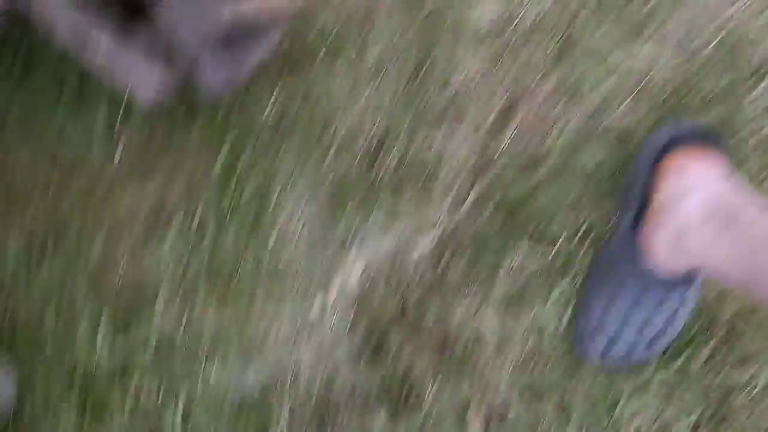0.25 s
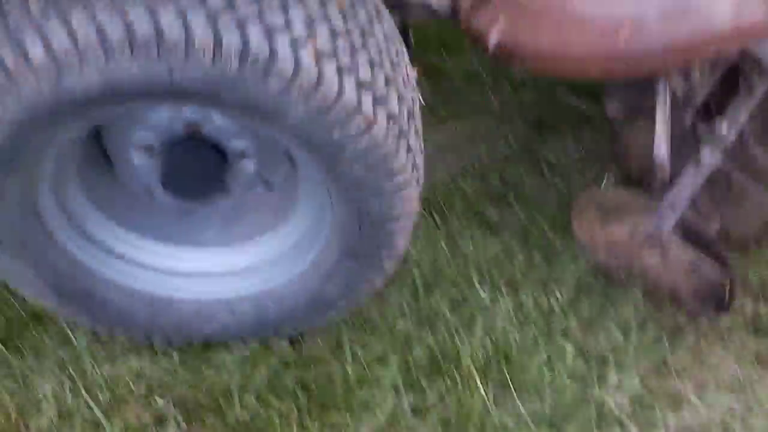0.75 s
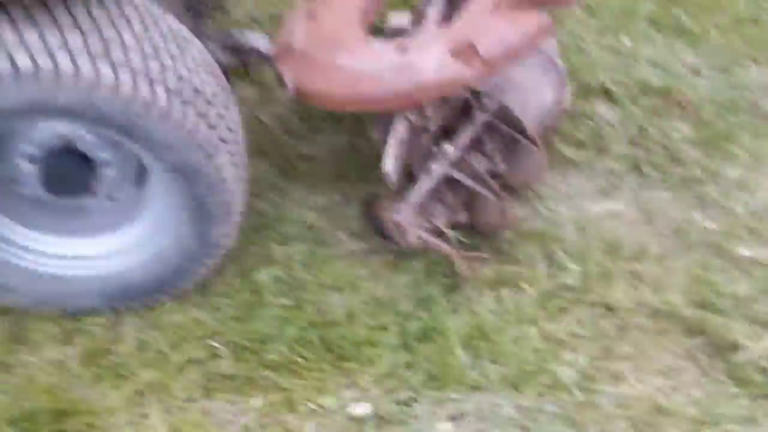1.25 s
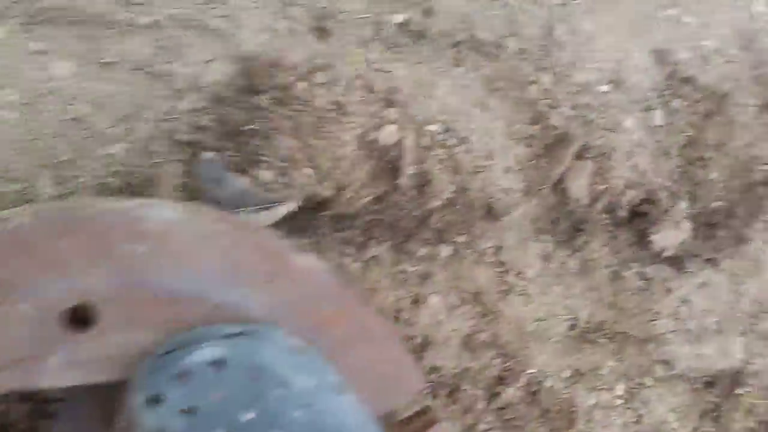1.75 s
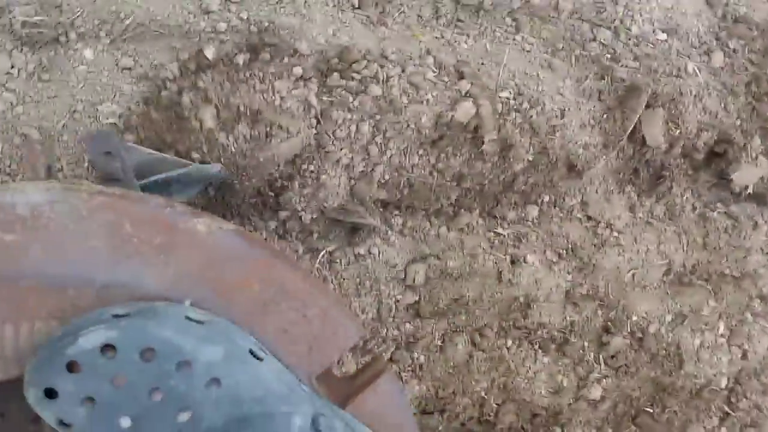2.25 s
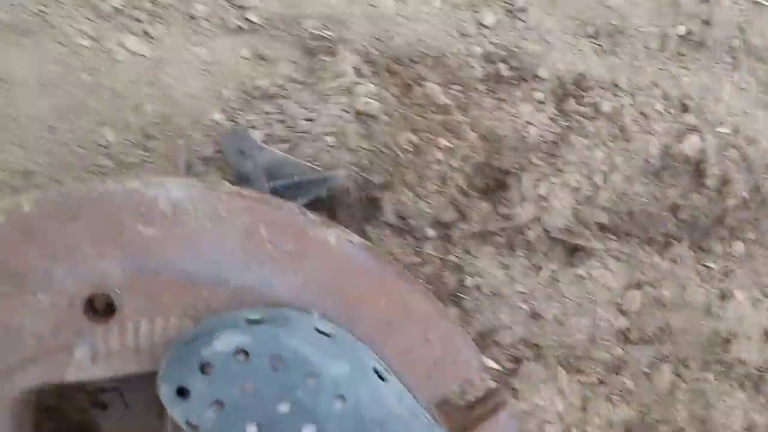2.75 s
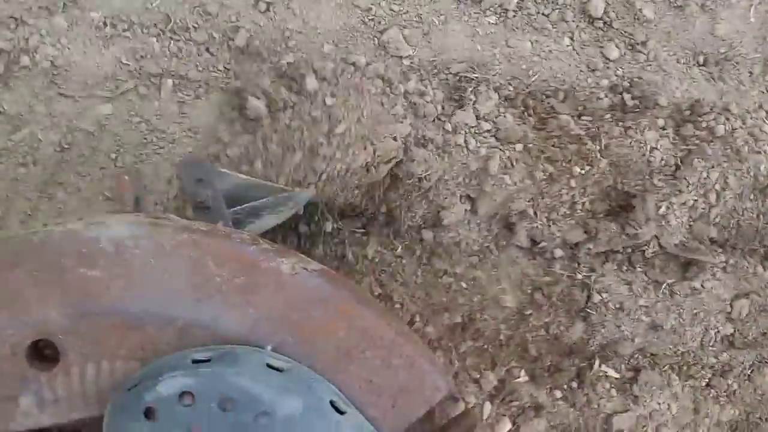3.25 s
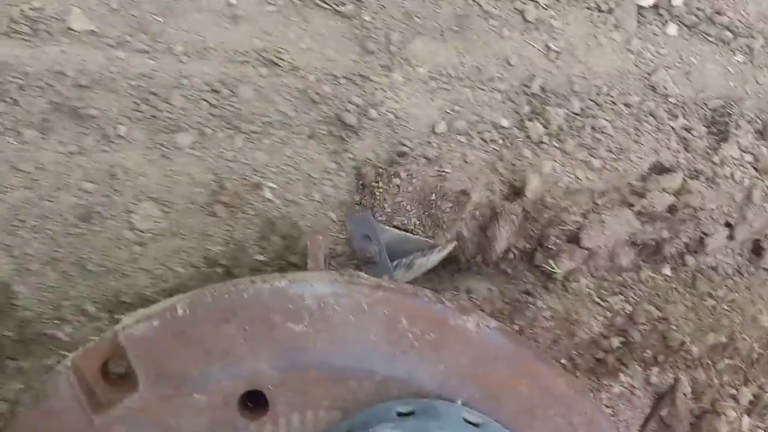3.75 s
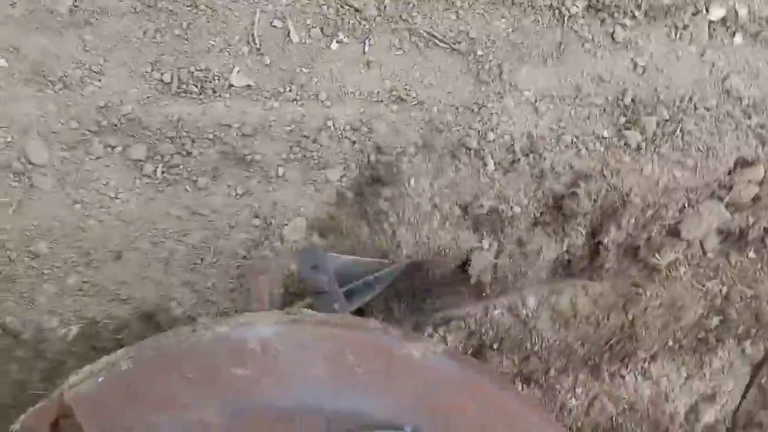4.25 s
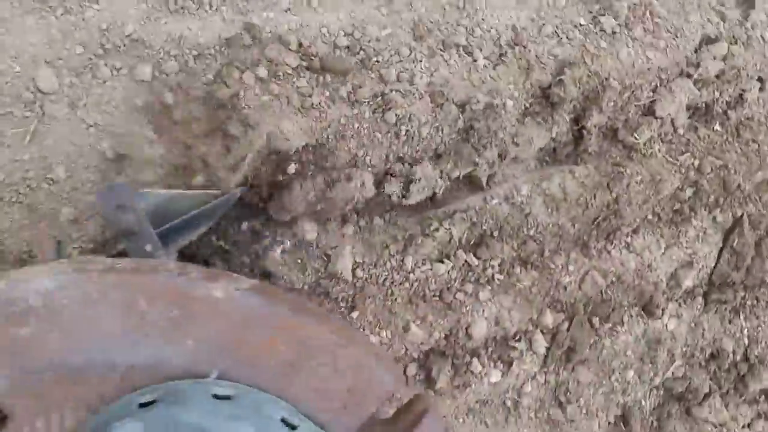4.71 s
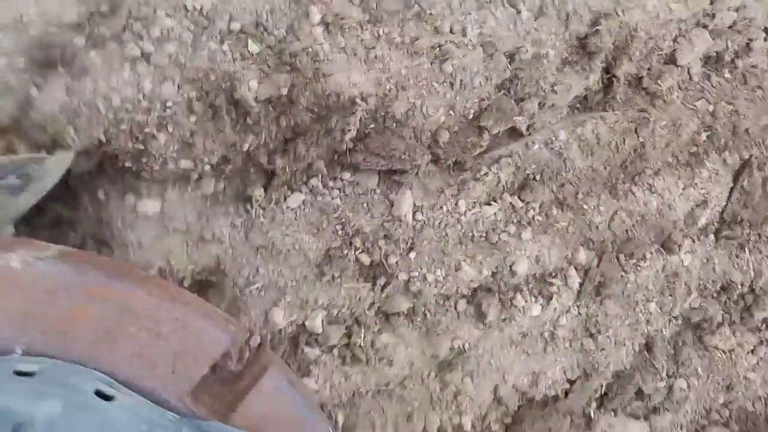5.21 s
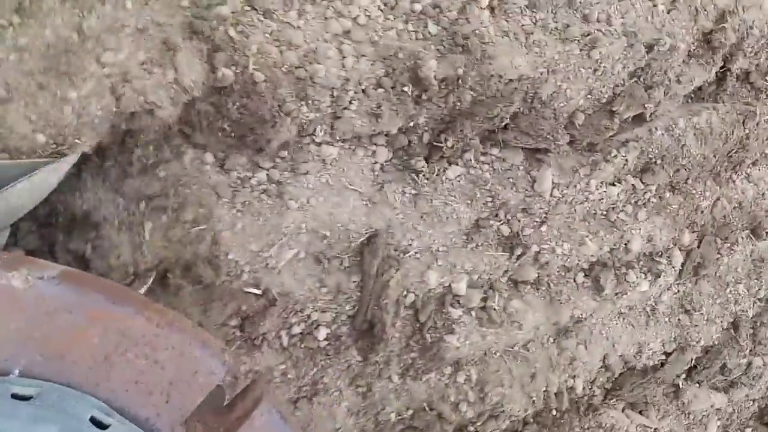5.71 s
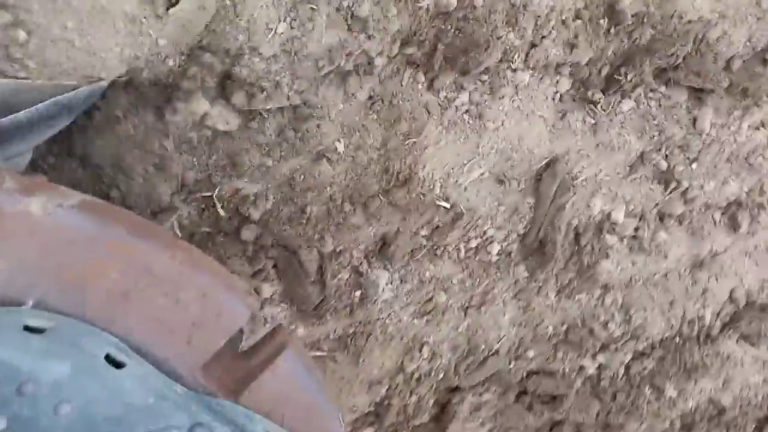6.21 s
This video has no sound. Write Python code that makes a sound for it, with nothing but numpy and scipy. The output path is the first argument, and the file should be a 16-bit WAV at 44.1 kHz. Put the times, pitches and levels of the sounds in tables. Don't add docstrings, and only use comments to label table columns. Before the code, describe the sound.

Close outdoor small tractor engine: lumpy low-speed putter with one soft footstep, sudden cut to a higher, loaded clattering roar with small stone ticks.

```python
import sys
import numpy as np
from scipy import signal
from scipy.fft import rfft, irfft
from scipy.io import wavfile
from scipy.ndimage import uniform_filter1d, map_coordinates

SR = 44100
rng = np.random.default_rng(int(sys.argv[2]) if len(sys.argv) > 2 else 0)


def unload_audio(sound):
    columns = np.transpose(np.atleast_2d(sound))
    steps = np.round(np.clip(columns, -1, 1) * 32767)
    wavfile.write(sys.argv[1], SR, steps.astype(np.int16))


def volts_from_decibels(level):
    exponent = np.asarray(level, float) / 20
    return 10 ** exponent


N = 285327
T = np.arange(N) / SR
HZ = np.maximum(np.fft.rfftfreq(N, 1 / SR), 1)

# t/s, effort/0-1, facing/0-1
SLOW_EFFORT = [
    (0, 0, 0),
    (.24, 0.8, 0),
    (.36, 0.6, 0.65),
    (.49, 0.88, 1),
    (.61, 1, 0.73),
    (.84, 0.26, 1),
    (1.0, 0.47, 1),
    (1.356, 0.15, 0.48),
]
FAST_EFFORT = [
    (1.361, 0, 0.17),
    (2.1, 0.38, 0.16),
    (2.7, 0.89, 0.5),
    (4.3, 0.56, 0.7),
    (5.4, 1, 0.23),
    (6.47, 0.77, 0.48),
]
# t/s, cycle rate/Hz
SLOW_SPEED = [(0, 21.4), (.25, 20.5), (.55, 20.05), (.65, 20.25), (.85, 21.03), (.97, 20.9), (1.356, 19.75)]
FAST_SPEED = [(2.4, 29.40), (3.0, 29.47), (4.3, 29.47), (4.8, 29.42), (5.4, 29.46)]
# multiple of the cycle rate/1, level/dB
SLOW_ORDERS = [(1, -46), (2, -27), (3, -16), (4, -14), (5, 0), (6, -2), (7, -11.5), (8, -5), (9, -15),
               (10, -6), (11, -10), (12, -15), (13, -19), (14, -21), (15, -13), (16, -11), (17, -22)]
FAST_ORDERS = [(1, -51), (2, -6.5), (3, -4), (4, -11.5), (5, -2), (6, -5.5), (7, -9), (8, -9.5), (9, -20.5),
               (10, -8), (11, -13.5), (12, -24.5), (13, -12), (14, -39), (15, -18), (16, -22), (17, -43),
               (18, -46), (19, -35.5), (20, -21), (21, -18.5), (22, -33), (23, -18)]
SLOW_FIRING = (.387, .86, .358, .65, 2.9, -.58, .10)
FAST_FIRING = (.411, 1.18, .114, .77, 18.4, 3.09, .15)
# f/Hz, level/dB
SLOW_GAS = [(60, -14), (200, -10.5), (320, -5), (420, -12), (600, -10), (870, -10.5), (960, -14.5),
            (1300, -12.5), (1700, -18)]
FAST_GAS = [(60, -4.5), (200, -16.5), (320, -1.5), (500, -7), (780, -7.5), (870, -2.5), (1000, -13.5),
            (1300, -11), (1700, -6)]
# f/Hz, level/dB
SLOW_BLOCK = [(590, -29), (1000, -33), (1170, -23), (1260, -5.5), (1650, 4), (2060, -4.5), (2170, -4.5),
              (2700, -10), (3240, -16), (4980, -20), (6500, -41), (8450, -56), (14300, -120)]
FAST_BLOCK = [(590, -13), (1000, 1), (1140, 3.5), (1260, -6), (1570, -6.5), (1800, 4.5), (2370, 0),
              (2900, -5), (3250, -14.5), (4000, -14), (4640, -19), (5260, -19.5), (6010, -28), (6500, -30),
              (8450, -146), (14300, -120)]
# f/Hz, width/Hz, level against the rattle/dB
SLOW_TIN = [(555, 36, -11.5), (875, 8.7, -9.5), (1808, 110, -30), (3500, 130, -31), (7660, 210, -34.5)]
FAST_TIN = [(700, 27, -7.5), (1730, 19, -9.5), (1821, 18, -8.5), (1965, 10.5, -13), (2296, 22, -9.5),
            (3390, 71, -21.5), (3950, 130, -30), (4870, 43, -25), (5250, 51, -25), (7160, 60, -27.5)]
# f/Hz, level/dB
SLOW_FAN = [(4000, -27), (5800, 1.5), (7200, 3.5), (8100, -11), (8500, -3), (10000, -6), (11500, -2),
            (13500, -3), (14900, -6), (15700, -8)]
FAST_FAN = [(4000, -30), (5800, -6), (7200, 2), (8150, -6), (8350, -24), (8800, -28), (9300, -20),
            (9900, -12), (11300, -10), (13200, -12), (14200, -16), (15300, -17), (15700, -24)]
# level/dB, gain at full effort/dB, gain when faced/dB
SLOW_LAYERS = [
    (-19.5, 3, 0),
    (-25.5, -0.4, -1.4),
    (-30, -2.5, 6),
    (-33, 2.1, 0.7),
    (-42, 0, 5),
]
FAST_LAYERS = [
    (-18.5, 2.02, 1.5),
    (-28, 0.53, 3),
    (-32, 4.3, 0.5),
    (-31, 0.28, 3.86),
    (-40, 0.49, 4.4),
]
# t/s, held/s, f/Hz, level/dB
HOLLOW = [(-.1, 0.47, 3500, -37.5), (.28, 0.27, 1780, -30.5), (.35, 0.29, 4210, -33), (.68, 0.4, 3950, -35),
          (1.3, 0.71, 3810, -35.5), (2.0, 1.8, 3620, -39), (3.7, .6, 3870, -44), (4.3, 0.72, 3800, -38),
          (4.95, 1.7, 4220, -39.5)]
# slap t/s, slap level/dB, thud t/s, thud f/Hz, thud level/dB, thud length/s
STEP = (.287, -22.5, .32, 80, -16.5, .055)
# t/s, level/dB, f/Hz
STONES = [
    (3.90, -36, 7600),
    (4.655, -33, 7200),
    (6.188, -24, 1350),
]
# t/s, level/dB
SLOW_WIND = [(0, -36), (.25, -33), (.45, -36), (.7, -38), (1.356, -46)]
# f/Hz, share/0-1
DIRECT = [(60, .6), (200, .8), (500, .88), (1500, .8), (3000, .7), (6000, .52), (12000, .2)]
# f/Hz, left minus right level/dB
TILT = [(250, 0), (1300, -1), (4400, 2), (8000, -1.5), (15000, 3.5)]
# first shot ends t/s, second shot begins t/s
CUT_S = (1.356, 1.361)

SLOW_LAG, FAST_LAG = 16., 22.
SLOW_START, FAST_START = -.216, .299


def tractor(speed, effort_table, layers, lag, start, orders, firing, gas, block, fan, tin):
    s, *columns = np.transpose(effort_table)
    effort, facing = (np.interp(T, s, column) for column in columns)
    thump_gain, gas_gain, low_gain, high_gain, fan_gain = (
        volts_from_decibels(db + up_db * effort + faced_db * facing) for db, up_db, faced_db in layers)
    cycle_hz = np.interp(T, *np.transpose(speed)) * (1 + .002 * walk(12))
    phase = start + np.cumsum(cycle_hz) / SR
    thump = exhaust(phase, orders, firing, effort)
    chuff = gas_chuff(thump, gas)
    low, high = rattle(thump, block, tin)
    air = cooling_fan(fan)
    body = thump_gain * thump + low_gain * low + high_gain * high + fan_gain * air
    return reach(body, lag) + reach(gas_gain * chuff, 0.66 * lag)


def exhaust(phase, orders, firing, effort):
    gap, size, echo, echo_size, bass_lag, shape, rough = firing
    out = 0
    for k, db in orders:
        second_blow = 1 + size * np.exp(-2j * np.pi * k * gap)
        pipe_echo = 1 + echo_size * np.exp(-2j * np.pi * k * echo)
        offset = np.angle(second_blow * pipe_echo) + bass_lag / k + shape
        uneven = (walk(28) + 1j * walk(28)) / np.sqrt(2)
        burn = 1 + rough * min(k, 9) / 6 * uneven + .011 * k * walk(2.5)
        bark_db = 7 * (effort - 0.82) if k > 12 else 0
        tone = np.real(burn * np.exp(1j * (2 * np.pi * k * phase + offset)))
        out = out + volts_from_decibels(db + bark_db) * tone
    return unit(out)


def gas_chuff(thump, gas):
    return unit(1.1 + np.abs(thump)) * hiss(gas, flicker_db=1.2, count=5)


def rattle(thump, block, tin):
    spectrum = rfft(hiss(block, flicker_db=0.52, count=10) + tinwork(tin))
    low_share = 1 / (1 + (HZ / 3000) ** 8)
    parts = []
    for share in (low_share, 1 - low_share):
        knocks = (5 + np.abs(thump)) * volts_from_decibels(1.1 * walk(110))
        parts.append(unit(irfft(spectrum * share, N) * knocks))
    return parts


def tinwork(modes):
    spectrum, out = ports(), 0
    for hz, width, db in modes:
        ring = unit(irfft(spectrum / (1 + ((HZ - hz) / max(width, hz / 170)) ** 2), N))
        out = out + volts_from_decibels(db + 1.5 * walk(4) + 2.5 * walk(30)) * ring
    return out


def cooling_fan(fan):
    return hiss(fan, flicker_db=1.1, count=6) * unit(volts_from_decibels(1.1 * walk(90)))


def hollow():
    spectrum, out = ports(), 0
    for s, held, hz, db in HOLLOW:
        band = unit(irfft(spectrum / (1 + ((HZ - hz) / 135) ** 2), N))
        out = out + volts_from_decibels(db) * band * np.clip(np.minimum(T - s, s + held - T) / .08 + .5, 0, 1)
    return reach(out * volts_from_decibels(2 * walk(20)), np.where(T < CUT_S[0], SLOW_LAG, FAST_LAG))


def footstep():
    slap_s, slap_db, thud_s, thud_hz, thud_db, length = STEP
    colour = np.clip(HZ / 1500, 0, 1) / (1 + HZ / 6000)
    crisp = 1 + 2 / (1 + ((HZ - 7300) / 600) ** 2)
    grass = unit(irfft(ports() * colour * crisp, N))
    slap = volts_from_decibels(slap_db) * grass * (T > slap_s - .003) * np.exp(-np.abs(T - slap_s) / .005)
    thud = np.sin(2 * np.pi * thud_hz * T) * np.exp(-((T - thud_s) / length) ** 2)
    return slap + volts_from_decibels(thud_db) * thud


def stones():
    spectrum, out = ports(), 0
    for s, db, hz in STONES:
        tick = unit(irfft(spectrum / (1 + ((HZ - hz) / 500) ** 2), N))
        out = out + volts_from_decibels(db) * tick * (T > s) * np.exp(-np.abs(T - s) / .009)
    return reach(out, FAST_LAG)


def wind():
    rumble = unit(irfft(ports() / (1 + (HZ / 90) ** 4), N))
    level_db = np.interp(T, *np.transpose(SLOW_WIND), right=-120)
    return rumble * volts_from_decibels(level_db + 3.0 * walk(10))


def garden_hush():
    return volts_from_decibels(-56) * unit(irfft(ports() / (1 + HZ / 300), N))


def hiss(colour, flicker_db, count):
    spectrum = ports() * volts_from_decibels(on_log(colour, -200))
    out, swell = 0, .4 * walk(5)
    place = np.interp(np.log(HZ), np.log([colour[0][0], colour[-1][0]]), [0, count - 1])
    for k in range(count):
        share = np.cos(np.pi / 2 * np.clip(place - k, -1, 1)) ** 2
        out = out + irfft(spectrum * share, N) * volts_from_decibels(swell + flicker_db * walk(14))
    return unit(out)


def ports():
    shared, left, right = rfft(rng.standard_normal((3, N)))
    direct = on_log(DIRECT)
    return np.sqrt(direct) * shared + np.sqrt(1 - direct) * np.array([left, right])


def reach(sound, lag):
    left, right = sound
    return np.array([left, map_coordinates(right, [np.arange(N) - 0.999 * lag], order=3, mode="nearest")])


def walk(rate):
    k = int(SR / rate)
    held = np.repeat(rng.standard_normal(N // k + 1), k)
    return unit(uniform_filter1d(uniform_filter1d(held, k), k)[:N])


def on_log(points, outside=None):
    hz, value = np.transpose(points)
    return np.interp(np.log(HZ), np.log(hz), value, outside, outside)


def unit(x):
    return x / np.sqrt(np.mean(x ** 2))


def scene():
    slow = tractor(SLOW_SPEED, SLOW_EFFORT, SLOW_LAYERS, SLOW_LAG, SLOW_START, SLOW_ORDERS, SLOW_FIRING,
                   SLOW_GAS, SLOW_BLOCK, SLOW_FAN, SLOW_TIN)
    fast = tractor(FAST_SPEED, FAST_EFFORT, FAST_LAYERS, FAST_LAG, FAST_START, FAST_ORDERS, FAST_FIRING,
                   FAST_GAS, FAST_BLOCK, FAST_FAN, FAST_TIN)
    cavity = hollow()
    fade_out = np.clip((CUT_S[0] - T) / .003, 0, 1)
    fade_in = np.clip((T - CUT_S[1]) / .006, 0, 1)
    engine = (slow + cavity) * fade_out + (fast + cavity) * fade_in
    return engine + footstep() + stones() + wind() + garden_hush()


def top_cut(x):
    return signal.sosfilt(signal.butter(12, 15600, fs=SR, output="sos"), x)


def record(dry):
    tilt = on_log(TILT) / 2
    bass_cut = 1 / np.sqrt(1 + (50 / HZ) ** 12)
    lead = np.exp(.5j * .17 / (1 + (HZ / 130) ** 2))
    port_colour = volts_from_decibels(np.array([tilt, -tilt])) * np.array([lead, 1 / lead])
    heard = irfft(rfft(dry) * port_colour * bass_cut, N)
    rounded = np.tanh(.8 * heard) / .8
    return top_cut(rounded)


dry = scene()
out = record(dry)
unload_audio(out)
```